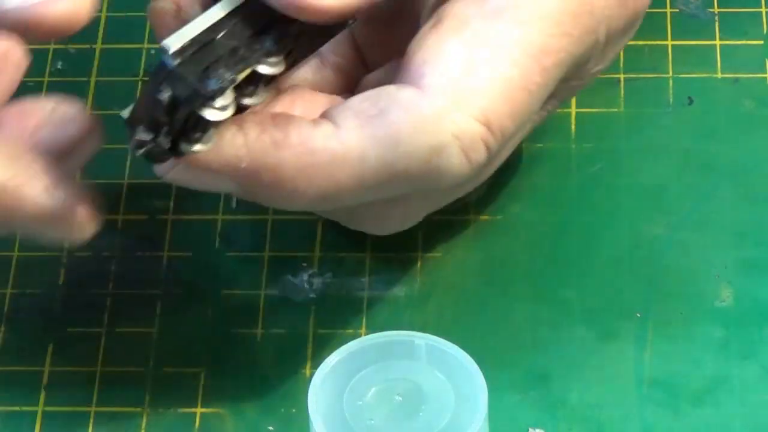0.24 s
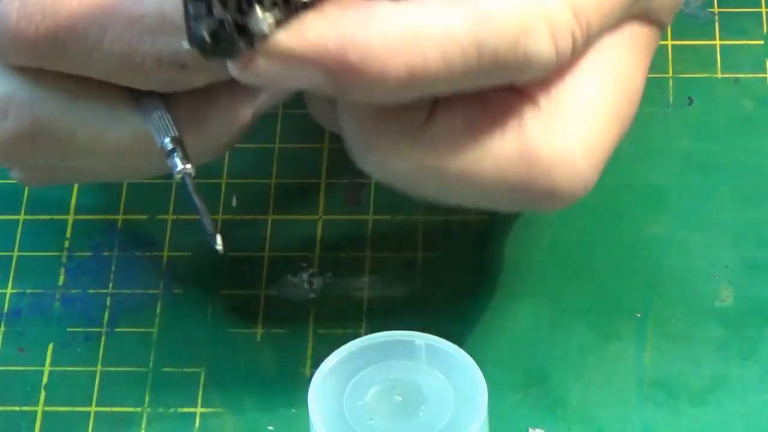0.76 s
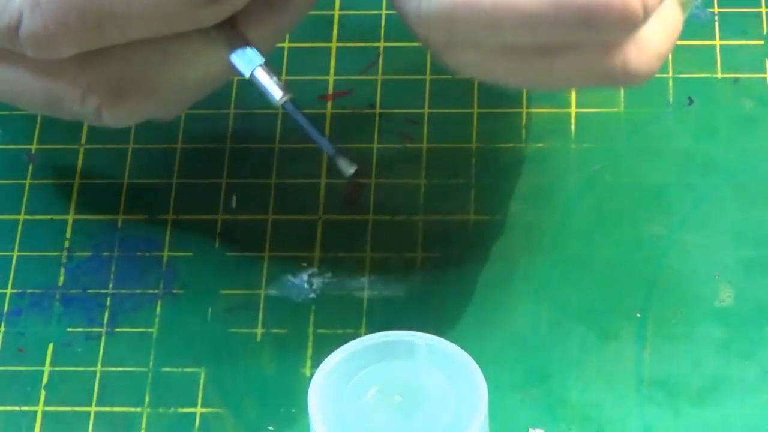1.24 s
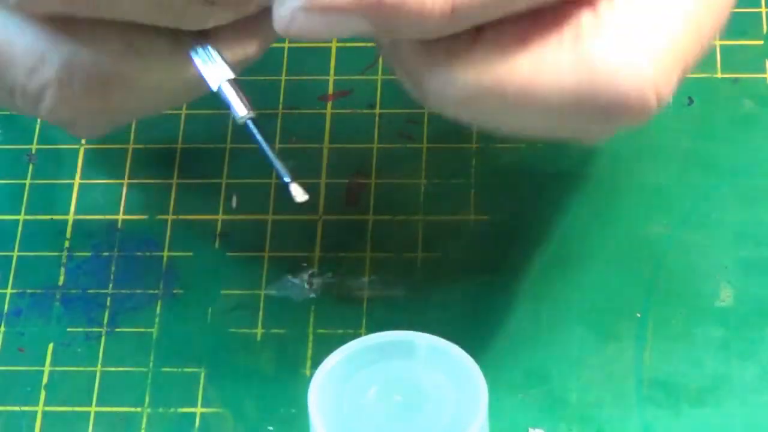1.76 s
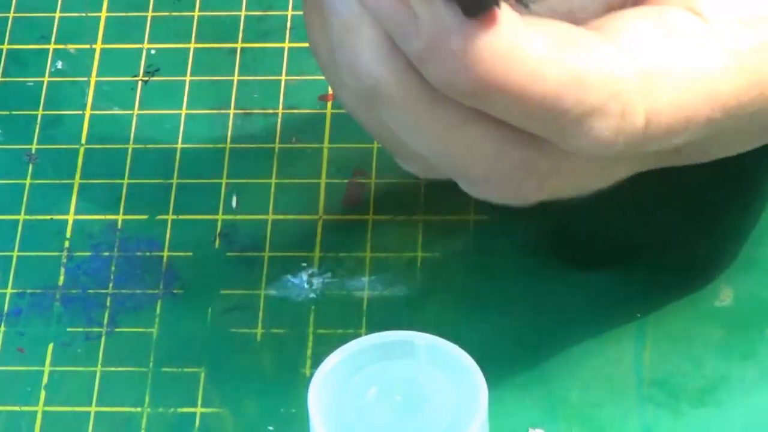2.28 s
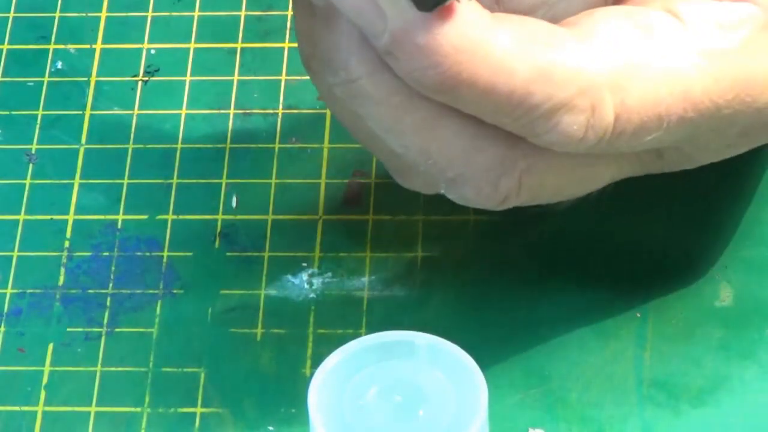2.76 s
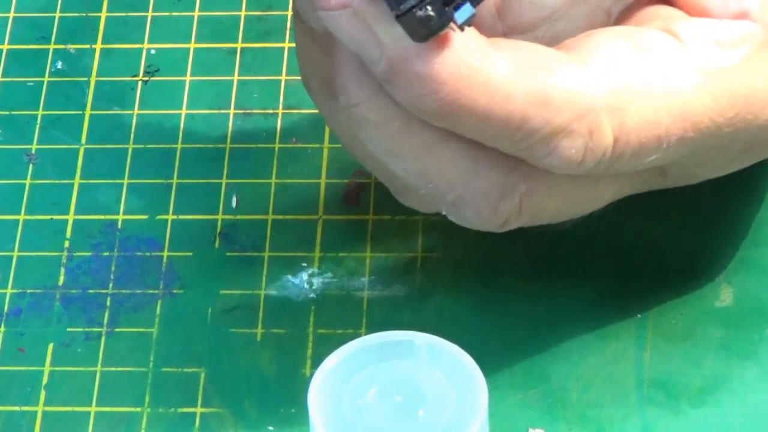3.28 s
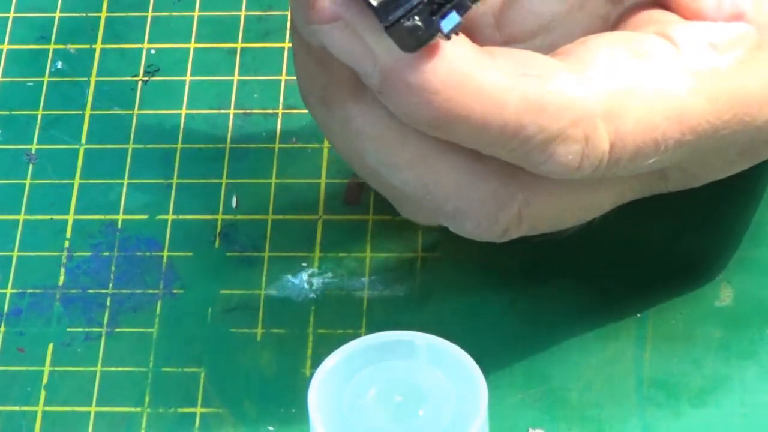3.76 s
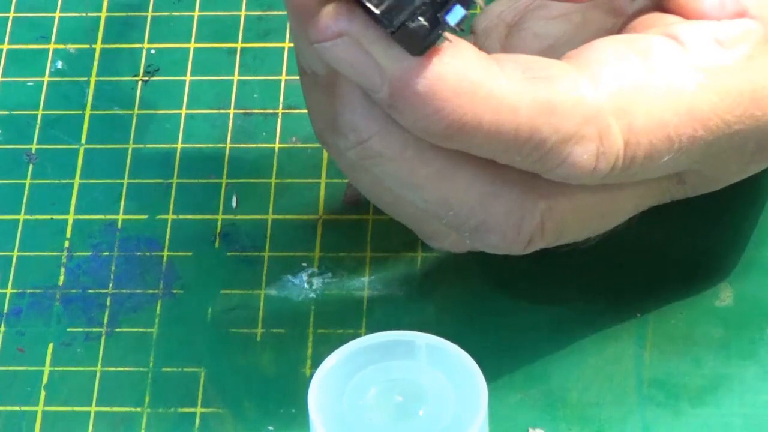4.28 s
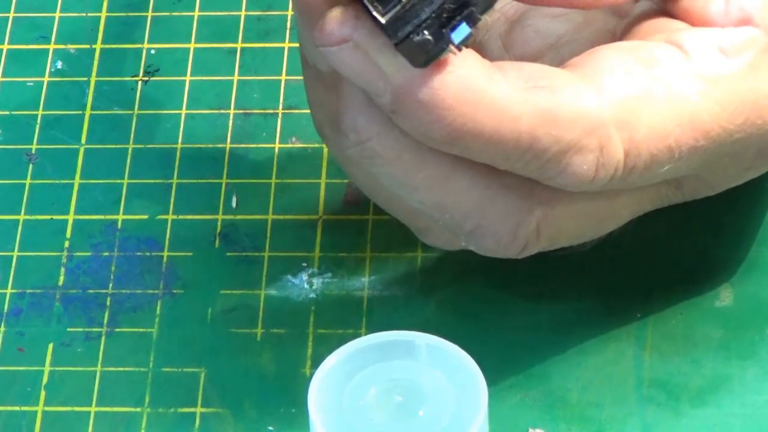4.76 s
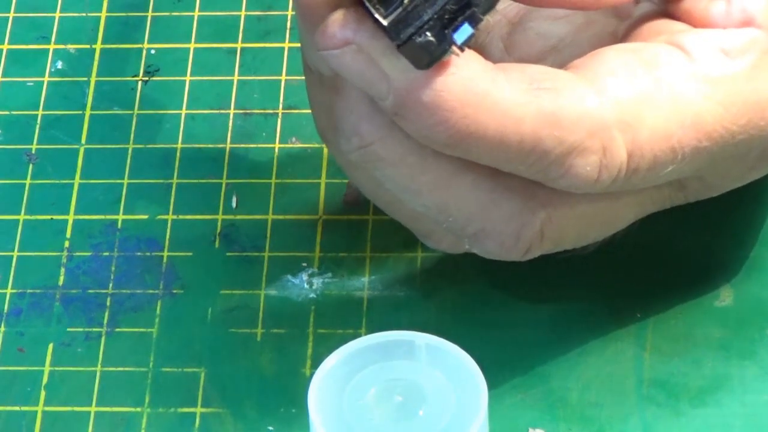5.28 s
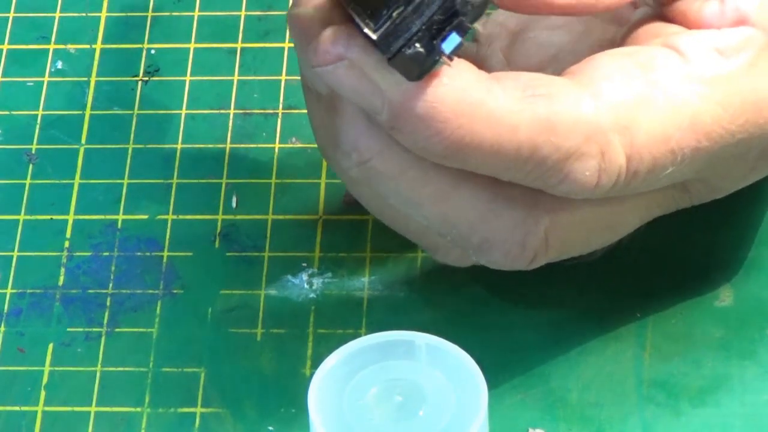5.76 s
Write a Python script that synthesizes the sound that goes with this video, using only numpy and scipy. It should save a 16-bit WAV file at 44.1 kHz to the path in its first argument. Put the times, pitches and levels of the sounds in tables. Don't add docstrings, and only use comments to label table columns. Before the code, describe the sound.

Close tabletop handling: bright clicks and dry finger scuffs over an airy hiss with low drone that stops, then a sharp snap in near silence.

```python
import sys
import numpy as np
from scipy import signal
from scipy.fft import rfft, irfft, next_fast_len
from scipy.io import wavfile
from scipy.ndimage import uniform_filter1d

SR = 44100
rng = np.random.default_rng(int(sys.argv[2]) if len(sys.argv) > 2 else 0)


def master(y):
    cut = np.clip(np.atleast_2d(y).T, -1, 1)
    pcm = np.round(cut * 32767)
    wavfile.write(sys.argv[1], SR, pcm.astype(np.int16))


def ratio(d):
    e = np.asarray(d, float) / 20
    return 10 ** e


N = 265916

# (time [s], level [dB])
PUMP_EFFORT = [(0.0, -50), (0.45, -47.5), (1.2, -48), (1.6, -45), (1.75, -43), (1.87, -46), (2.0, -43.5),
               (2.15, -46.5), (2.6, -48.5), (2.9, -49), (3.2, -51.5), (3.235, -58), (3.3, -67.5),
               (3.45, -64.5), (3.7, -110)]
# (frequency [Hz], likeness [0-1])
PUMP_LIKENESS = [(60, 0.99), (180, 1), (550, 0.98), (1650, 0.52), (4970, 0.74), (15000, 1)]


def rms_one(x):
    return x / np.sqrt(np.mean(x ** 2) + 1e-20)


def pump_effort_db():
    s, level_db = np.transpose(PUMP_EFFORT)
    return np.interp(np.arange(N) / SR, s, level_db)


def at_hz(points, hz):
    curve_hz, value = np.transpose(points)
    return np.interp(np.log(hz), np.log(curve_hz), value)


def drift(rate_hz):
    r = np.exp(-80 * np.pi * rate_hz / SR)
    settle = 2000
    white = rng.standard_normal(N // 40 + settle + 2)
    slow = signal.lfilter([1], [1, -2 * r, r * r], white)[settle:]
    return np.interp(np.arange(N) / 40, np.arange(len(slow)), rms_one(slow))


def ring(force, hz, t60):
    r = ratio(-60 / (t60 * SR))
    w = 2 * np.pi * hz / SR
    return signal.lfilter([0, np.sin(w)], [1, -2 * r * np.cos(w), r * r], force + 1e-18)


def spread_out(mid, side, likeness):
    alike = np.clip(likeness, 0, 1)
    return np.sqrt((1 + alike) / 2) * mid + np.sqrt((1 - alike) / 2) * side * [[1], [-1]]


def banded_noise(spectrum, likeness, patchy_db):
    edges = np.geomspace(spectrum[0][0], spectrum[-1][0], 17)
    out = 0
    together = drift(24)
    white = rng.standard_normal((2, 2, N))
    for k, (low, high) in enumerate(zip(edges, edges[1:])):
        band = signal.butter(2, [low, high], "band", fs=SR, output="sos")
        mid, side = signal.sosfilt(band, white[k % 2])
        gain = ratio(patchy_db * (0.68 * together + drift(21.5)))
        out = out + gain * spread_out(mid, side, at_hz(likeness, np.sqrt(low * high)))
    size = next_fast_len(N)
    colour = ratio(at_hz(spectrum, np.fft.rfftfreq(size, 1 / SR) + 1))
    return rms_one(irfft(rfft(out, size) * colour, size)[:, :N])


def resonant_noise(peaks, likeness):
    out = 0
    white = rng.standard_normal((2, N))
    for hz, width_hz, level_db in peaks:
        t60 = np.log(1000) / np.pi / width_hz
        mid, side = rms_one(ring(white, hz, t60))
        swell_db = 1.7 * drift(1.7) * (hz < 600)
        out = out + ratio(level_db + swell_db) * spread_out(mid, side, at_hz(likeness, hz))
    return out


def surges():
    # (middle [s], length [s], frequency [Hz], rms level [dB])
    surge_rows = [(.25, 0.4, 133, -60), (0.644, 1, 516, -66), (1.18, 0.26, 386, -58.5),
                  (1.702, 0.25, 378, -58), (.04, 0.43, 288, -54.5), (.25, 1, 199, -59),
                  (0.726, 0.3, 200.6, -56.5), (0.86, 0.61, 278, -54.5), (1.104, 0.33, 168, -56.5),
                  (1.527, 0.58, 201.4, -54), (1.542, .35, 272, -50), (1.9, 0.55, 311, -52),
                  (1.95, 0.31, 107, -55.5), (2.036, 0.21, 169.4, -55.5), (2.5, 0.44, 275, -54),
                  (2.905, 0.4, 102, -54), (3.22, 0.26, 278.3, -56), (3.186, .15, 186, -62)]
    t = np.arange(N) / SR
    out = 0
    wander = .5 * drift(11)
    for s, length, hz, level_db in surge_rows:
        swell = np.cos(np.pi * np.clip((t - s) / length, -.5, .5)) ** 2
        tone = np.sqrt(2) * np.sin(2 * np.pi * hz * t + wander)
        out = out + ratio(level_db) * swell * tone
    return out


def pump():
    # (frequency [Hz], density [dB per Hz])
    hiss_colour = [(290, -30), (500, -5), (553, -1), (594, -4.5), (769, -6.5), (839, -6), (1040, -5),
                   (1700, -7.5), (2070, -6), (3150, -4), (4440, -2.5), (5350, -6), (6360, -2), (7450, -9),
                   (15500, -24)]
    # (frequency [Hz], width [Hz], level [dB])
    hiss_peaks = [(631, 16, -19.5), (744, 22, -18), (1067, 23, -16), (1396, 25, -24), (2136, 83, -16.5),
                  (2412, 54, -15.5), (3256, 24, -14), (3540, 31, -16), (3706, 33, -13), (4300, 24, -17.5),
                  (4405, 13, -14), (6500, 28, -14), (6710, 79, -23.5), (6910, 82, -18.5)]
    # (frequency [Hz], left minus right [dB])
    balance = [(60, 0.0), (180, -0.5), (550, -1.0), (1650, -3.5), (4970, -1.5), (15000, 0.0)]
    # (frequency [Hz], width [Hz], level [dB])
    upper_modes = [(276.6, 12, -1), (309.6, 49, 1.5), (366, 23, -12), (427, 19, -21), (505, 8, -8)]
    middle_modes = [(171, 14, -8), (199.6, 5, 8.5), (221, 3.6, 0)]
    lowest_modes = [(71.3, 3.4, -7), (109, 5.7, 4.5), (120, 16, 3)]
    drone_db = [-4.5, -12, -14]
    linger_s, sag_db_per_s, lag_s = 0.097, 0.65, .000018

    effort = ratio(pump_effort_db())
    r = np.exp(-1 / (linger_s * SR))
    drone = signal.lfilter([1 - r], [1, -r], effort, zi=[r * effort[0]])[0]
    hiss = banded_noise(hiss_colour, PUMP_LIKENESS, patchy_db=1.34)
    hiss = rms_one(hiss + resonant_noise(hiss_peaks, PUMP_LIKENESS))
    air = effort * hiss + surges()
    sag_db = sag_db_per_s * np.arange(N) / SR
    for level_db, modes in zip(drone_db, [upper_modes, middle_modes, lowest_modes]):
        air = air + drone * ratio(level_db - sag_db) * rms_one(resonant_noise(modes, PUMP_LIKENESS))
    size = next_fast_len(N)
    hz = np.fft.rfftfreq(size, 1 / SR) + 1
    lead = np.exp(1j * np.pi * np.minimum(hz, 5000) * (hz < 9000) * lag_s)
    lean = ratio(at_hz(balance, hz) / 2) * lead
    return irfft(rfft(air, size) * [lean, 1 / lean], size)[:, :N]


def hum():
    # (multiple of the mains, level [dB])
    mains_harmonics = [(2, -69), (3, -78), (5, -75.5), (6, -77), (7, -79)]
    mains_hz, mains_db, sag_db_per_s = 50.09, -53.5, 0.5
    beat_hz, slowing_hz_per_s2, start_cycles = 3.99, .185, -.378
    motor_db, case_hz, case_db, case_resting_db = -15, 74.6, -16.5, -79

    t = np.arange(N) / SR
    effort = ratio(uniform_filter1d(pump_effort_db(), size=SR // 4))
    phase = 2 * np.pi * mains_hz * t
    mains = ratio(mains_db - sag_db_per_s * t) * np.sin(phase)
    harmonics = sum(ratio(level_db) * np.sin(round(k) * phase) for k, level_db in mains_harmonics)
    beat = 2 * np.pi * (start_cycles + beat_hz * t - slowing_hz_per_s2 * t ** 3 / 3)
    motor = ratio(motor_db) * effort * np.sin(phase - beat)
    case_level = ratio(case_db) * effort + ratio(case_resting_db)
    case = case_level * np.sin(2 * np.pi * case_hz * t)
    return np.sqrt(2) * (mains + harmonics + motor + case)


def ticks():
    # (frequency [Hz], level [dB], t60 [s], delay [s])
    body_steps = [(2590, -55, 0.0052, 0.0029), (3000, -58.5, 0.011, .001), (3510, -58, 0.029, .0030),
                  (3520, -69, 0.012, .0215), (2800, -64, 0.022, .014)]
    treble_steps = [(12250, -67, .01, .0105), (12250, -70, .01, .017), (14200, -65, .015, .003),
                    (14200, -68, .012, .0275), (15100, -65, .012, .0135), (15100, -67, .012, .0215),
                    (15100, -66, .015, .0265), (15100, -70, .01, .005)]
    start_s, period_s = .0088, .04
    at = np.arange(start_s, N / SR - .04, period_s)
    out = 0
    for hz, level_db, t60, delay in body_steps + treble_steps:
        force = np.zeros(N)
        late, loud = rng.standard_normal((len(at), 2)).T
        hits = ((at + delay + .0002 * late) * SR).astype(int)
        force[hits] = ratio(level_db + (1.9 + (hz > 9000)) * loud)
        soft = ring(force, hz, 0.0039) * 0.12
        out = out + ring(soft, hz, t60)
    return out * ratio(np.array([[.8], [-.8]]))


def noise_floor():
    # (frequency [Hz], density [dB per Hz])
    floor_colour = [(35, -41), (60, -10), (76, -10), (197, -19), (322, -22.5), (353, -18.5), (478, -21),
                    (604, -22), (1110, -26.5), (1500, -26), (2030, -28.5), (3240, -31.5), (3550, -32),
                    (5160, -35), (15800, -38)]
    # (frequency [Hz], left-right likeness [0-1])
    floor_likeness = [(60, 0.97), (150, 1), (500, 0.3), (1600, 0.15), (4000, 0.44), (8000, 0.93),
                      (12000, 0.73)]
    # (frequency [Hz], width [Hz], level [dB])
    floor_peaks = [(71, 15, -74.5), (1462, 140, -69.5)]
    noise = ratio(-58.5) * banded_noise(floor_colour, floor_likeness, patchy_db=0.8)
    return noise + resonant_noise(floor_peaks, floor_likeness)


def strike(force, centre_hz, octaves, ring_hz, ring_db, order):
    # (frequency [Hz], level [dB], t60 [s])
    part_modes = [(2280, -17.5, 0.021), (2900, -7, 0.026), (4100, 4, 0.035), (5140, 2, 0.015),
                  (6160, -18.5, .008), (6900, 14, 0.011), (8300, 7, 0.011), (9700, 4, 0.0048),
                  (10500, 3.5, 0.018), (11900, -11.5, 0.0073)]
    wide = 2 ** np.clip(octaves, .08, 3)
    edges = [centre_hz / wide, min(centre_hz * wide, .45 * SR)]
    crack = signal.sosfilt(signal.butter(order, edges, "band", fs=SR, output="sos"), force)
    rings = 0
    for hz, level_db, t60 in part_modes:
        chance_db = 2 * rng.standard_normal()
        rings = rings + ratio(level_db + chance_db) * ring(crack, hz, t60)
    near_mode = ring(force, ring_hz, .009)
    return rms_one(crack) + ratio(-7) * rms_one(rings) + ratio(ring_db) * rms_one(near_mode)


def add(out, s, sound):
    i = round(s * SR)
    out[:, i:i + sound.shape[1]] += sound


def click(hz, octaves, ring_hz, ring_db):
    t = np.arange(SR // 10) / SR
    force = (t == 0) + .26 * rng.standard_normal(len(t)) * np.exp(-t / .0013)
    sound = strike(force, hz, octaves, ring_hz, ring_db, order=3)
    return ratio(np.array([[.6], [-.6]])) * sound / np.abs(sound).max()


def scuff(length, hz, octaves, ring_hz, ring_db):
    t = np.arange(SR // 10) / SR
    stroke = np.sin(np.pi * np.clip(t / length, 0, 1) ** 0.43) ** 0.52
    uneven = ratio(7.0 * rng.standard_normal(len(t)))
    slips = rng.standard_normal((2, len(t))) * uneven * stroke
    mid, side = strike(slips, hz, octaves, ring_hz, ring_db, order=2)
    side = signal.sosfilt(signal.butter(2, 6500, fs=SR, output="sos"), side)
    sound = spread_out(mid, side, 0.86) * ratio(np.array([[-.8], [.8]]))
    return rms_one(sound) * np.sqrt(length * SR / len(t))


def handling():
    # (time [s], peak [dB], centre [Hz], main ring [Hz], main ring [dB])
    broad_clicks = [(.4992, -26, 7000, 7640, 5), (2.224, -31, 10000, 11900, 14),
                    (2.23, -31, 10000, 11600, 14), (3.2948, -37, 7500, 9550, -1),
                    (3.3012, -44, 8500, 10260, 0), (3.542, -28.5, 6050, 9950, -6),
                    (4.2018, -43, 6500, 5190, -4), (4.712, -40, 7200, 6900, -22),
                    (5.057, -50, 7500, 8300, 0)]
    # (time [s], peak [dB], frequency [Hz], spread [octaves])
    pings = [(1.3876, -26.5, 9050, 0.34), (2.0712, -28, 11800, 0.41), (2.224, -39, 5880, 0.12),
             (2.2306, -41, 5880, .15), (2.352, -45, 11860, .2), (2.4294, -42, 11700, .1),
             (2.438, -41, 11900, .12), (2.864, -32, 7500, 0.42), (3.543, -49, 1940, 0.19),
             (4.5206, -54, 3430, .15), (4.7118, -53, 2090, 0.16), (5.0823, -47, 8400, 0.24),
             (5.114, -52, 7500, .4), (5.379, -51, 9600, .4), (5.392, -47, 8250, .6)]
    # (time [s], peak [dB], frequency [Hz], spread [octaves])
    snap = [
        (4.2381, -27, 7800, .95),
        (4.2434, -15, 7600, .5),
        (4.2439, -21, 1550, .9),
    ]
    # (start [s], length [s], level [dB], centre [Hz], main ring [Hz])
    rubs = [(0.813, 0.029, -46.5, 3000, 2210), (0.916, 0.025, -50, 4900, 7000),
            (1.122, 0.043, -44.5, 3320, 2980), (1.123, 0.058, -49.5, 475, 390),
            (1.498, 0.024, -48.5, 3500, 2130), (1.671, 0.028, -42.5, 3300, 2520),
            (2.013, 0.041, -48, 590, 403), (2.296, .012, -43.5, 460, 640),
            (2.297, 0.011, -50.5, 1700, 1000), (2.78, 0.036, -50, 2430, 2300),
            (3.379, 0.057, -58.5, 390, 684), (4.221, 0.043, -46, 3900, 9700)]
    brushes = [(0.493, 0.038, -46.5, 6400, 8130), (0.507, 0.02, -46.5, 3000, 2230),
               (1.303, .051, -56.5, 7000, 8300), (1.972, .031, -46.5, 5960, 5900),
               (2.005, 0.046, -44.5, 5130, 7600), (2.105, .062, -52, 6740, 6150),
               (2.14, 0.03, -49, 2470, 2360), (2.244, .034, -50, 4960, 4100),
               (3.056, 0.079, -52, 4230, 3670), (3.375, 0.041, -55, 6650, 6300),
               (4.328, 0.068, -61, 6860, 8260)]
    # (start [s], length [s], level [dB], frequency [Hz])
    squeaks = [(1.746, 0.066, -54, 6450), (1.823, 0.096, -52.5, 2060), (2.008, 0.032, -43.5, 2140),
               (3.566, 0.014, -64, 2800), (4.197, .01, -60, 2900), (3.383, .02, -55.5, 6200),
               (4.333, .045, -66, 8260), (4.334, .04, -70, 9700), (5.048, .012, -68, 8300),
               (5.544, .02, -69, 8200)]

    out = np.zeros((2, N))
    for s, peak_db, hz, ring_hz, ring_db in broad_clicks:
        add(out, s, ratio(peak_db) * click(hz, 0.77, ring_hz, ring_db))
    for s, peak_db, hz, octaves in pings + snap:
        add(out, s, ratio(peak_db) * click(hz, octaves, hz, ring_db=-7))
    for s, length, level_db, hz, ring_hz in rubs:
        add(out, s, ratio(level_db) * scuff(length, hz, 1.43, ring_hz, ring_db=-5.5))
    for s, length, level_db, hz, ring_hz in brushes:
        add(out, s, ratio(level_db) * scuff(length, hz, 0.73, ring_hz, ring_db=-7))
    for s, length, level_db, hz in squeaks:
        add(out, s, ratio(level_db) * scuff(length, hz, 0.084, hz, ring_db=-5))
    return out


def room(x):
    t60_s, wall_cut_hz = .13, 13700
    t = np.arange(SR // 4) / SR
    tail = rng.standard_normal((2, len(t))) * ratio(-60 * t / t60_s) * (t > .002)
    tail = signal.sosfilt(signal.butter(1, wall_cut_hz, fs=SR, output="sos"), tail)
    tail = spread_out(*tail, 0.7)
    tail = tail / np.sqrt(np.sum(tail ** 2) / 2)
    return signal.fftconvolve(x, tail, axes=1)[:, :N]


def scene():
    background = pump() + hum() + ticks() + noise_floor()
    hands = handling()
    return background + hands + ratio(-10.5) * room(hands)


def top_cut(x):
    return signal.sosfilt(signal.butter(12, 15960, fs=SR, output="sos"), x)


def record(dry):
    low_pass = signal.ellip(12, .5, 70, 15700, fs=SR, output="sos")
    mix = signal.sosfilt(low_pass, dry)
    return top_cut(mix)


dry = scene()
out = record(dry)
master(out)
```